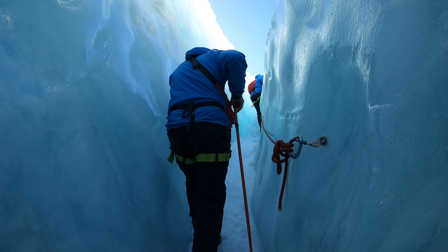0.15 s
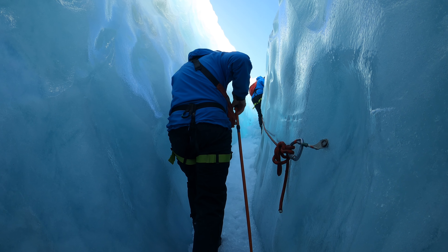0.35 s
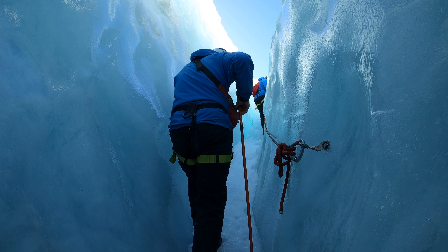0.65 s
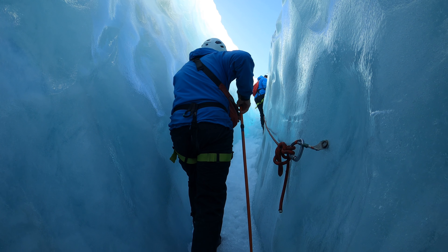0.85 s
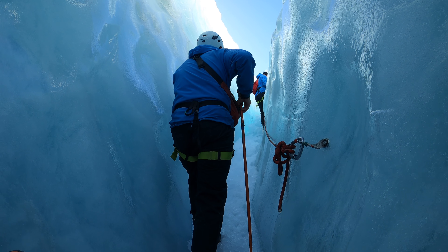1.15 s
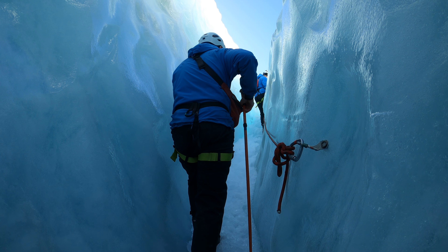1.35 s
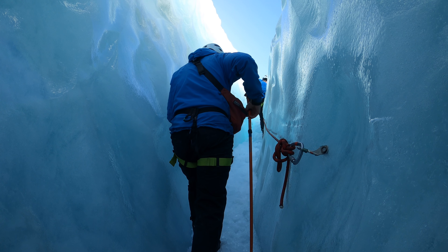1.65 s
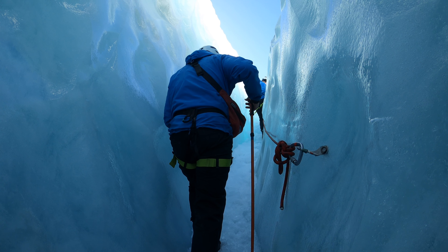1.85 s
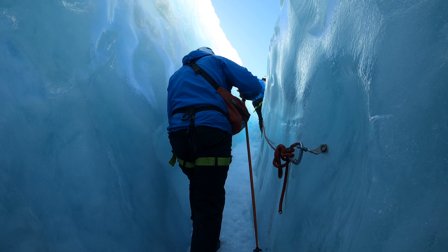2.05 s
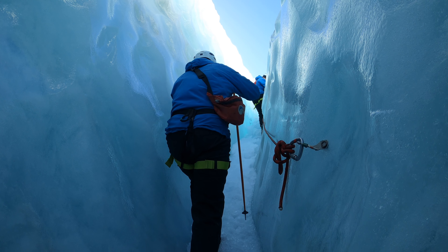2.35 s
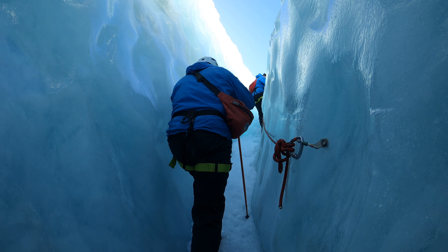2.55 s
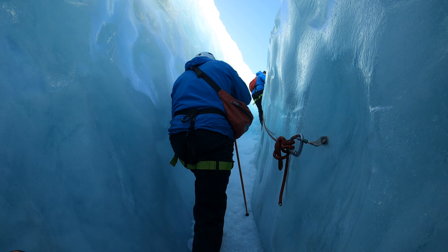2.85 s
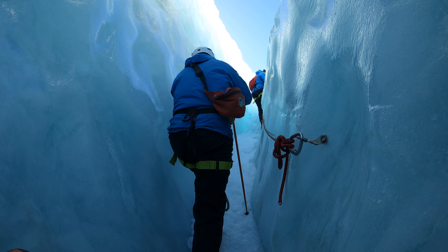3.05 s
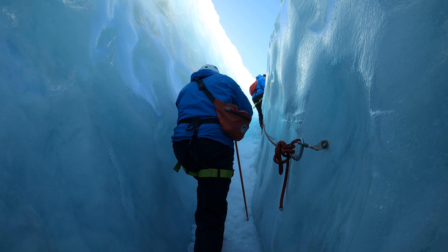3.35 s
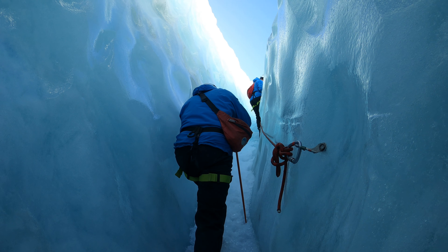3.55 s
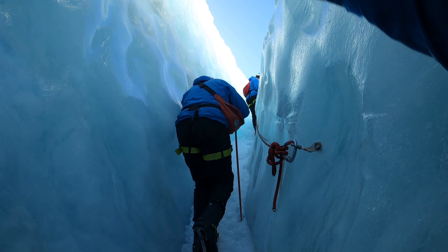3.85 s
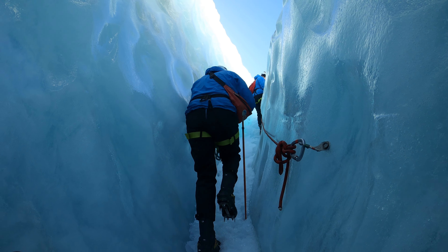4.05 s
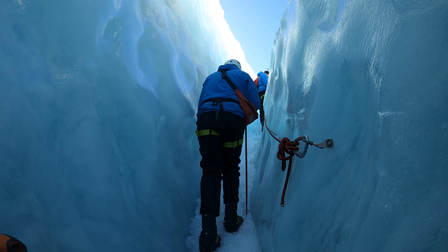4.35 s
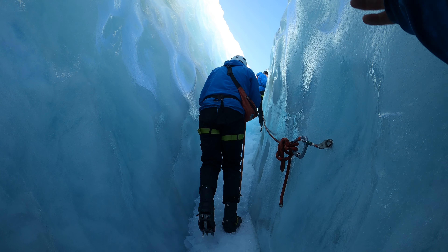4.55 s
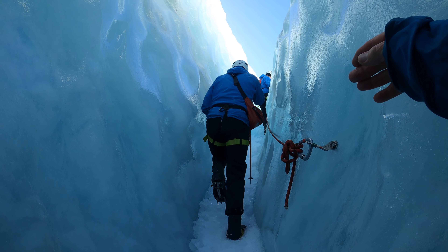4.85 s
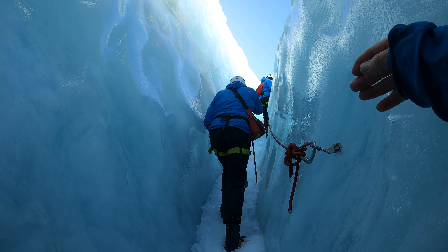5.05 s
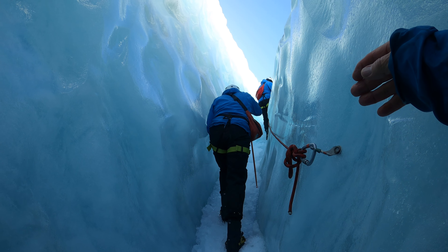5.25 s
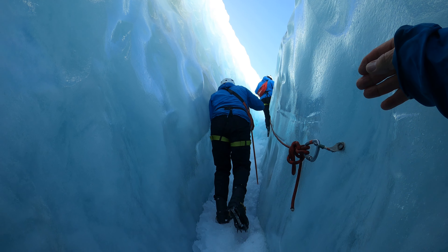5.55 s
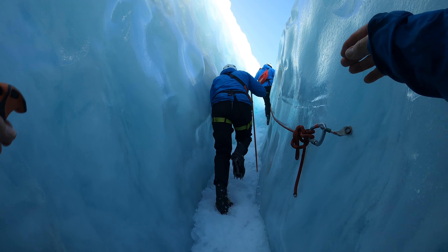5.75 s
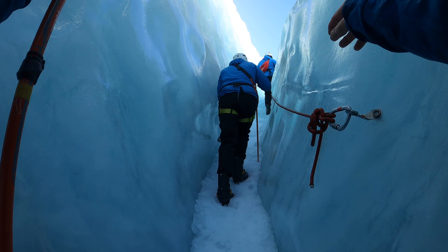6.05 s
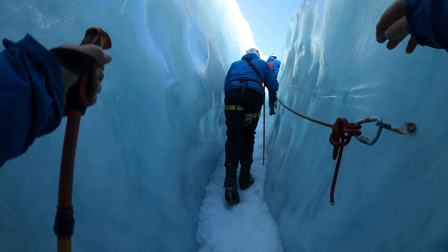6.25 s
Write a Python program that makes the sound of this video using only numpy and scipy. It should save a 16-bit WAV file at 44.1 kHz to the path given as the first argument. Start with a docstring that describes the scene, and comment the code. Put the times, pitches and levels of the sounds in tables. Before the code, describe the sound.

Spiked boots crunch unevenly on snow in a narrow ice passage, with gear ticks, strap rubbing and a dull heartbeat close to the microphone.

```python
"""Spiked boots crunch on snow and ice in a narrow slot of a glacier, heard from a camera on the walker's chest.
The crunch is brittle fracture: a dense train of impulses from snapping grains, with single cracks and ticks.
It echoes briefly between the ice walls and is coloured by the housing's two ports; metal links clink.
Heartbeat, strap rub, thuds, jolts and sway reach both capsules through the mount as structure-borne bass,
over the faint low noise of the slot."""
import sys
import numpy as np
from scipy import signal
from scipy.fft import rfft, irfft, next_fast_len
from scipy.io import wavfile
from scipy.ndimage import uniform_filter1d

SR = 44100
rng = np.random.default_rng(int(sys.argv[2]) if len(sys.argv) > 2 else 0)


def int16_out(signal):
    """Quantize to a 16-bit WAV file."""
    q = np.round(np.clip(np.atleast_2d(signal).T, -1, 1) * 32767)
    wavfile.write(sys.argv[1], SR, q.astype(np.int16))


N = 282328
T = np.arange(N) / SR

# boots and poles crushing or dragging through ice grains:
# t/s at full pressure, rise/s, hold/s, fall/s, body level/dB, crisp/dB re body, sizzle/dB re body
CRUNCHES = [(.66, .2, 0, 0.077, -56.5, -8.5, -45), (1.429, 0.16, 0.22, 0.15, -50, -12, -50),
            (1.566, 0.11, 0.13, 0.039, -50, -7, -29), (2.189, 0.016, 0, .05, -58, 5.5, -14),
            (2.292, 0.092, 0, .1, -54, -3, -26), (2.353, 0.02, 0.046, 0.38, -42, 1.5, -22),
            (2.468, 0.13, 0.072, 0.099, -31, -4.5, -29), (2.729, .12, 0.0011, 0.024, -36, -6, -31),
            (3.362, 0.033, 0.041, 0.092, -49, -10, -55), (3.439, .02, 0.012, 0.037, -32, -4, -30),
            (3.55, 0.067, 0, 0.053, -46, -2.5, -48), (3.661, 0.037, 0.011, 0.068, -35.5, -8, -35),
            (3.801, 0.19, 0.051, 0.1, -34.5, -6.5, -32.5), (4.017, 0.075, 0.056, 0.19, -40, -2, -29),
            (4.371, .08, 0.071, .13, -38.5, -5, -28), (4.56, 0.018, 0.015, 0.084, -36.5, -9, -33),
            (4.76, 0.067, 0.057, 0.81, -52.5, 2, -26), (4.96, 0.35, 0.15, 0.12, -34, -6.5, -41),
            (5.122, 0.046, 0.029, 0.13, -29, -6, -30), (5.26, .1, 0.025, 0.14, -46.5, 4.5, -13),
            (5.571, 0.068, 0.086, 0.11, -32, -5.5, -42), (5.76, 0.072, 0, 0.45, -36.5, -7, -45),
            (6.061, 0.041, 0.017, 0.063, -29.5, -7, -32), (6.137, .05, 0.027, 0.11, -42.5, -3.5, -32),
            (6.31, 0.15, 0.0049, 0.068, -42, -3, -40), (6.35, 0.016, 0.012, 0.042, -34.5, -6, -24),
            (6.395, .05, 0, .05, -40, 0, -20)]
# faint rustle of grains between the steps: t/s, body level/dB, crisp level/dB, sizzle level/dB
GRAIN_RUSTLE = [(0, -57, -65, -105), (.48, -66.5, -71.5, -104), (.84, -66, -72.5, -105),
                (1.09, -62, -71.5, -107), (1.26, -66, -71, -105), (1.75, -65.5, -66.5, -100),
                (2.01, -58, -62.5, -86), (2.14, -65, -76, -106), (2.65, -57, -53.5, -68),
                (2.78, -53.5, -54, -72), (2.9, -59.5, -57.5, -77), (3.06, -54, -64.5, -100),
                (3.33, -60, -65, -101), (3.6, -72, -69, -87), (3.93, -48.5, -48.5, -67),
                (4.25, -55.5, -53.5, -70.5), (4.6, -74, -58.5, -78.5), (5.4, -48.5, -47, -60.5),
                (6, -65, -49.5, -71), (6.4, -57, -59, -75)]
# spikes biting and crust breaking: t/s, level/dB, treble/dB re level, body t60/s
CRUST_CRACKS = [(.2246, -46, -30, 0.014), (.8972, -43, -13, 0.032), (2.2422, -40, -10, 0.024),
                (2.2842, -41, -11, .022), (2.358, -27.5, -5, 0.048), (2.4348, -19.5, -16, .035),
                (2.7076, -34, 7.5, 0.017), (2.781, -38, -16, 0.038), (2.8825, -37.5, -5, 0.059),
                (3.3694, -36.5, -19, .033), (3.427, -38, -7, .027), (3.441, -15, -7, 0.025),
                (3.5366, -29.5, -23, 0.018), (3.5588, -32.5, -16, 0.012), (3.5779, -30, -39, 0.031),
                (3.6597, -24.5, -1, 0.021), (3.669, -23, -5.5, 0.025), (3.7659, -28, 6.5, 0.013),
                (3.7881, -22.5, -26, 0.014), (3.8381, -18.5, -12, 0.058), (3.9812, -31.5, -31, 0.033),
                (4.0585, -34, -17, 0.02), (4.3309, -30.5, -1, 0.019), (4.3613, -22, -8, 0.029),
                (4.3808, -24.5, -15, 0.017), (4.4308, -37, -10, 0.035), (4.562, -18, -33, 0.034),
                (4.581, -31, -7, 0.027), (4.6269, -25, -26, .027), (4.736, -34, -5, .03),
                (5.025, -19.5, -30, 0.02), (5.1222, -29, -6, 0.028), (5.2648, -29.5, -16, 0.023),
                (5.5486, -22.5, -19, 0.022), (5.9816, -47, 9, .028), (6.0526, -24, -5, .024),
                (6.308, -30, -24, 0.025), (6.344, -15.5, -13, .024), (6.3677, -22, -4, 0.041),
                (6.3865, -19, -9, 0.019), (6.3954, -20.5, -14, 0.043)]
# small hard ticks of gear and ice chips: t/s, level/dB
CHIP_TICKS = [(0.0213, -45.5), (0.124, -44), (.2254, -49), (.258, -52), (0.659, -52), (0.865, -46),
              (0.9252, -49.5), (1.0096, -56), (1.233, -53), (1.3637, -48), (1.7942, -46), (1.912, -50),
              (1.983, -54), (2.182, -39.5), (2.2852, -38), (2.3455, -32), (3.0217, -45), (4.4061, -21.5),
              (4.557, -34), (6.343, -14), (6.3954, -23)]
# sound from straight ahead rings a port cavity near 3 kHz: t/s, level/dB re crisp
CAVITY_RING = [(0, 2), (1.2, -26), (1.6, -16), (2, -27), (2.5, -0.5), (3, -49), (3.6, -34), (4.2, -13),
               (5, -39), (6.4, -41)]
# bands of body, crisp, sizzle and cavity ring: lower f/Hz, upper f/Hz
CRUNCH_BANDS = [(40, 2000), (2000, 8200), (8200, 20000), (2650, 3450)]
# frequency responses of the housing's ports: f/Hz, gain/dB
LEFT_PORT_GAIN = [(700, -13), (1000, -2), (1220, 11), (1450, 4), (1900, -9), (2050, -16), (2400, -9),
                  (3000, -2), (3800, -6), (4900, -11.5), (5600, -16.5), (7600, -22.5), (8500, -36),
                  (12000, -35), (15000, -48)]
RIGHT_PORT_GAIN = [(700, -22.5), (1000, 2), (1280, 10.5), (1500, 0.5), (1900, -11), (2100, -10),
                   (2500, -15.5), (3100, -9.5), (3500, -6), (4000, -8.5), (4700, -5.5), (6200, -24.5),
                   (8100, -45.5), (10000, -44), (12500, -48), (15000, -68.5)]
# metal links ringing: t/s, level/dB, f/Hz, t60/s
LINK_MODES = [(.124, -46, 4760, 0.02), (.259, -51, 4900, 0.016), (0.865, -44, 3100, 0.025),
              (1.785, -73, 7700, 0.23), (1.822, -67, 4730, 0.092), (2.184, -47.5, 7270, 0.047),
              (2.286, -49, 7600, 0.065), (4.405, -61, 12000, 0.13)]
# heartbeats: t/s, level/dB, thump f/Hz, after-swing/dB re thump
HEARTBEATS = [(0.121, -24, 72.5, 0.5), (0.583, -23, 69, -9.5), (1.067, -31.5, 54.6, 0.5),
              (1.506, -25, 70, -10), (1.977, -23.5, 69.6, -7), (2.431, -25, 48.7, -6), (2.9, -32, 60, 1.5),
              (3.359, -28.5, 65.5, -2.5), (3.828, -37, 64, -9), (4.297, -34.5, 50, 5),
              (4.775, -26.5, 52.4, -13), (5.25, -27.5, 62, -3), (5.676, -25, 70, -32),
              (6.172, -25.5, 62.7, -1.5)]
# jolts of the mount: t/s, level/dB, f/Hz, t60/s
MOUNT_JOLTS = [(4.133, -25.5, 70, 0.26), (4.585, -30, 112, 0.18), (5.797, -20, 105, 0.12)]
# strap and jacket rubbing on the mount: t/s at full pressure, rise/s, hold/s, fall/s, level/dB
STRAP_RUBS = [(.02, .05, 0.089, .08, -51), (.36, 0.12, 0.054, 0.16, -60.5), (.53, .03, 0.15, .05, -56.5),
              (.78, 0.053, 0, 0.28, -55.5), (1.41, 0.1, 0.2, 0.24, -44.5), (1.69, .1, .02, .05, -57),
              (2.35, 0.0084, 0.013, .3, -44), (2.45, 0.09, .1, .09, -38), (2.73, 0.049, 0, 0.057, -53),
              (3.38, .04, 0, .06, -51), (3.79, 0.042, 0.049, .1, -35.5), (4.01, 0.065, 0.0084, 0.064, -37),
              (4.06, 0.039, .07, 0.12, -30), (4.39, 0.23, 0, 0.11, -39.5), (4.6, 0.27, 0.038, 0.047, -37.5),
              (4.76, 0.093, 0.13, .15, -44), (5.03, 0.25, 0.091, 0.23, -38), (5.28, 0.092, 0, 0.094, -59),
              (5.55, 0.013, 0.13, 0.057, -39), (5.79, 0.064, 0.032, 0.017, -32.5),
              (5.87, .05, .1, .1, -42.5), (5.99, 0.023, .2, 0.047, -34.5), (6.35, 0.15, 0, .1, -30)]
# dull thuds of the harness: t/s, hold/s, level/dB
HARNESS_THUDS = [(.1, 0.087, -48.5), (0.552, 0.095, -41.5), (0.666, 0.081, -47), (1.032, 0.36, -52),
                 (1.406, 0.18, -51), (1.75, 0.011, -60), (2.42, .1, -66), (2.775, 0.18, -51),
                 (3.393, 0, -36.5), (3.553, 0.14, -51.5), (3.92, 0.034, -40.5), (4.003, 0.035, -35),
                 (4.13, 0, -24.5), (4.28, 0.38, -50.5), (4.577, 0.07, -41), (4.75, 0.054, -42.5),
                 (5.04, 0, -46), (5.22, 0.048, -43.5), (5.72, 0.03, -51), (5.804, 0.16, -40.5),
                 (5.99, 0.12, -37), (6.24, 0.025, -44), (6.39, 0, -45)]
# deep rumble as the chest sways: t/s, level/dB
CHEST_SWAY = [(0, -37.5), (.5, -43.5), (1.3, -43), (1.7, -38.5), (1.8, -55.5), (2.05, -29), (2.3, -57.5),
              (2.6, -46.5), (3.2, -53.5), (3.75, -38.5), (3.96, -31), (4.06, -41), (4.13, -30), (4.28, -48),
              (4.65, -53), (4.76, -34), (5.1, -44.5), (5.3, -33.5), (5.55, -50), (5.8, -48), (5.97, -32.5),
              (6.05, -52.5), (6.4, -25)]
# noise spectra of rub, sway, thuds and the quiet slot: f/Hz, relative spectral density/dB
RUB_SPECTRUM = [(150, 3.5), (250, -3), (400, -9.5), (600, -14), (850, -17.5), (1100, -12.5), (2000, -74),
                (6000, -100)]
SWAY_SPECTRUM = [(12, -9), (22, 3), (45, -14.5), (75, -23), (130, -36), (300, -98), (1000, -120)]
THUD_SPECTRUM = [(40, -45), (75, 3.5), (110, -5), (170, -10), (260, -31.5), (600, -103), (2000, -110)]
SLOT_SPECTRUM = [(60, -22), (130, -10), (180, -8), (210, 0), (240, -12), (360, -20), (700, -29),
                 (1200, -50), (4000, -110)]

CRACK_SNAP_S, TICK_SNAP, TICK_T60_S = 0.13, 2.6, 0.019  # snaps weight the impulse against its burst
BODY_FLOOR_DB, CRISP_FLOOR_DB, CRISP_FLOOR_HZ = -80.5, -73, 5000
PLACES = 6  # spots on the floor, each with its own echo pattern
WALL_T60_S, WALL_DB, WALL_SHARED_HZ = 0.039, 1, 1560
PORT_TURN_HZ, PORT_TURN_WIDTH_HZ = 1990, 313  # around here the left port swings against the right
RECOIL_DELAY_S, RECOIL_RISE_S, RECOIL_FALL_S, RECOIL_DB = 0.099, 0.09, 0.11, -13
THUD_RISE_S, THUD_FALL_S, THUD_REST_DB, RUB_REST_DB = 0.071, 0.081, -68.5, -88
SLOT_DB, CUTOFF_HZ = -61, 15700


def footsteps():
    """Brittle fracture excites four parts, not yet band-limited: body, crisp, sizzle and cavity ring."""
    body_db, crisp_db, sizzle_db = crunch_levels()
    coarse = grains(per_s=6000, spread_db=2, flicker_hz=70, flicker_db=-1)
    fine = unit(grains(per_s=8000, spread_db=2, flicker_hz=60, flicker_db=1.5) + 0.34 * coarse)
    body = coarse * amp(body_db) + amp(BODY_FLOOR_DB) * rng.standard_normal(N)
    crisp = fine * amp(crisp_db)
    crisp += amp(CRISP_FLOOR_DB) * butterworth(rng.standard_normal(N), CRISP_FLOOR_HZ, "low")
    sizzle = fine * amp(sizzle_db)
    burst = rng.standard_normal(N) / 2  # peaks stand about twice above the rms
    for t, db, treble_db, t60 in CRUST_CRACKS:
        # the crust gives with a dull snap; the splinters build up just after it
        body += amp(db) * burst * decay(t, t60)
        body[int(t * SR)] += amp(db) * CRACK_SNAP_S / t60  # the shorter the crack, the harder its snap
        crisp += amp(db + treble_db) * burst * (decay(t, 2.2 * t60) - decay(t, 0.005))
    for t, db in CHIP_TICKS:
        crisp += amp(db) * burst * decay(t, TICK_T60_S)
        crisp[int(t * SR)] += amp(db) * TICK_SNAP
    cavity = crisp * amp(np.interp(T, *np.transpose(CAVITY_RING)))
    return body, crisp, sizzle, cavity


def grains(per_s, spread_db, flicker_hz, flicker_db):
    """Shot noise: crystals snap one by one in uneven flurries, a few far louder than the rest."""
    snaps = rng.random(N) < per_s / SR
    size_db = spread_db * rng.exponential(size=N)
    impulses = snaps * rng.standard_normal(N)
    return unit(impulses * amp(size_db + flicker_db * flicker(flicker_hz)))


def crunch_levels():
    """Steps and rustle add in power, giving the body, crisp and sizzle levels in dB."""
    times, *rustle_db = np.transpose(GRAIN_RUSTLE)
    *timing, body_db, crisp_re_body, sizzle_re_body = np.transpose(CRUNCHES)
    return [swells(zip(*timing, body_db + offset_db), np.interp(T, times, rest_db))
            for offset_db, rest_db in zip((0, crisp_re_body, sizzle_re_body), rustle_db)]


def airborne_crunch():
    """Convolution: each part of the footsteps passes through its band of the paths, at unit power gain."""
    parts = footsteps()
    place_of_sample = rng.integers(PLACES, size=N)
    size = next_fast_len(N + SR // 4)
    spectrum = 0
    for place in range(PLACES):
        path = housing_ports(wall_echoes())
        for part, edges_hz in zip(parts, CRUNCH_BANDS):
            band = butterworth(path, edges_hz, "band")
            band /= np.sqrt(np.sum(band ** 2) / 2)
            spectrum += rfft(part * (place_of_sample == place), size) * rfft(band, size)
    return irfft(spectrum, size)[:, :N]


def wall_echoes():
    """Stereo impulse response: direct sound, then diffuse reflections, coherent at low frequencies."""
    t = np.arange(SR // 8) / SR
    shared = butterworth(rng.standard_normal(len(t)), WALL_SHARED_HZ, "low")
    separate = butterworth(rng.standard_normal((2, len(t))), WALL_SHARED_HZ, "high")
    response = (shared + separate) * np.exp(-np.log(1000) * t / WALL_T60_S) * (t > .002)
    response *= amp(WALL_DB) / np.sqrt(np.sum(response ** 2) / 2)
    response[:, 0] += 1  # direct sound
    return response


def housing_ports(pair):
    """Each port filters with its own resonances; an all-pass turns the phase of the left one."""
    pole = np.exp((2j * PORT_TURN_HZ - PORT_TURN_WIDTH_HZ) * np.pi / SR)
    denominator = np.array([1, -2 * pole.real, abs(pole) ** 2])
    left = signal.lfilter(denominator[::-1], denominator, pair[0])
    right = np.roll(pair[1], 4)  # a four-sample delay sets the stereo phase of the crunch near 1 kHz
    ports = np.array([minimum_phase(LEFT_PORT_GAIN), minimum_phase(RIGHT_PORT_GAIN)])
    return signal.fftconvolve(np.array([left, right]), ports, axes=1)


def clinks():
    """Each metal link rings in one damped mode, mostly caught by the brighter left port."""
    ring = sum(amp(db) * (decay(t, t60) - decay(t, 0.0053)) * np.sin(2 * np.pi * hz * (T - t))
               for t, db, hz, t60 in LINK_MODES)
    roughness = 1 + .5 * flicker(350)
    return ring * roughness * amp([[4], [-8]])


def heartbeat():
    """Each beat is a Gaussian tone pulse, followed by a damped free swing of the chest wall."""
    beats = 0
    for t, db, hz, swing_db in HEARTBEATS:
        age = T - t
        thump = np.exp(-((age - .008) / 0.012) ** 2) * np.cos(2 * np.pi * hz * age)
        thump += 0.18 * np.exp(-((age - .004) / 0.0049) ** 2) * np.cos(2 * np.pi * 1.83 * hz * age)
        swing = decay(t + .015, t60=.32) * np.sin(2 * np.pi * 27 * (age - .015))
        beats += amp(db) * (thump + amp(swing_db) * swing)
    return beats


def jolts():
    """A knock on the mount cracks first, then its pitch drops to the mount's natural frequency."""
    knocks = 0
    for t, db, hz, t60 in MOUNT_JOLTS:
        age = np.clip(T - t, 0, 1)
        cycles = hz * age + 0.53 * (1 - np.exp(-age / 0.00079))
        knocks += amp(db) * decay(t, t60) * np.sin(2 * np.pi * cycles)
    return knocks


def strap_rub():
    """Sliding friction of strap and jacket makes noise that swells with the pressure."""
    return mount_noise(RUB_SPECTRUM, swells(STRAP_RUBS, RUB_REST_DB), width=.16, flicker_hz=30)


def chest_sway():
    """Slow motion of the chest makes a rumble, which swells again shortly after each heartbeat."""
    recoils = [(t + RECOIL_DELAY_S, RECOIL_RISE_S, 0, RECOIL_FALL_S, db + RECOIL_DB)
               for t, db, *_ in HEARTBEATS]
    level_db = swells(recoils, np.interp(T, *np.transpose(CHEST_SWAY)))
    return mount_noise(SWAY_SPECTRUM, level_db, width=.12, flicker_hz=10)


def harness_thuds():
    """Soft impacts of the harness give bursts of low-frequency noise."""
    thuds = [(t, THUD_RISE_S, hold, THUD_FALL_S, db) for t, hold, db in HARNESS_THUDS]
    return mount_noise(THUD_SPECTRUM, swells(thuds, THUD_REST_DB), width=.06, flicker_hz=20)


def mount_noise(spectrum, level_db, width, flicker_hz):
    """Structure-borne noise is nearly coherent at the two capsules; its level flickers."""
    return stereo_noise(spectrum, width) * amp(level_db + 2.5 * flicker(flicker_hz))


def quiet_slot():
    """The background is stationary noise with a spectral peak near 210 Hz."""
    return amp(SLOT_DB) * stereo_noise(SLOT_SPECTRUM, width=.15)


def swells(rows, rest_db):
    """Power sum in dB of a resting level and swells (t, rise, hold, fall, dB); each slope spans 20 dB."""
    grid = T[::SR // 1000]
    power = amp(2 * np.interp(grid, T, np.broadcast_to(rest_db, N)))
    for t, rise, hold, fall, db in rows:
        before = np.clip(t - grid, 0, None) / max(rise, .01)
        after = np.clip(grid - t - hold, 0, None) / max(fall, .01)
        power += amp(2 * (db - 20 * (before + after)))
    return np.interp(T, grid, 10 * np.log10(power))


def decay(start, t60):
    """Exponential damping: the envelope jumps to 1 at start and falls 60 dB in t60."""
    envelope, first = np.zeros(N), int(np.ceil(start * SR))
    span = slice(first, first + SR // 2)
    envelope[span] = np.exp(-np.log(1000) * (T[span] - start) / t60)
    return envelope


def flicker(rate_hz):
    """Random modulation: Gaussian values drawn at rate_hz and joined by ramps."""
    hold = int(SR / rate_hz)
    return uniform_filter1d(np.repeat(rng.standard_normal(N // hold + 1), hold), hold)[:N]


def stereo_noise(spectrum, width):
    """Two independent noises of one spectrum: mid in phase at rms 1, side in antiphase at rms width."""
    mid, side = (unit(irfft(rfft(rng.standard_normal(N)) * bin_gains(spectrum, N), N)) for _ in range(2))
    return mid + width * side * np.array([[1], [-1]])


def minimum_phase(spectrum, size=2048):
    """Folding the cepstrum onto positive time gives the minimum-phase impulse response."""
    cepstrum = irfft(np.log(bin_gains(spectrum, size)), size)
    cepstrum[1:size // 2] *= 2
    cepstrum[size // 2 + 1:] = 0
    return irfft(np.exp(rfft(cepstrum)), size)[:size // 2]


def bin_gains(spectrum, size):
    """Amplitude at each FFT bin, from (f/Hz, level/dB) points joined on a log-frequency axis."""
    hz, db = np.transpose(spectrum)
    return amp(np.interp(np.log(np.fft.rfftfreq(size, 1 / SR) + 1), np.log(hz), db))


def butterworth(x, hz, kind):
    return signal.sosfilt(signal.butter(4, hz, kind, fs=SR, output="sos"), x)


def amp(db):
    return 10 ** (np.asarray(db) / 20)


def unit(x):
    return x / np.sqrt(np.mean(x ** 2))


def scene():
    """Superposition of airborne sound, structure-borne sound and background; the bass leans just left."""
    background = quiet_slot()
    airborne = airborne_crunch() + clinks()
    structure_borne = jolts() + heartbeat() + strap_rub() + chest_sway() + harness_thuds()
    return airborne + (structure_borne + background) * amp([[.3], [-.3]])


def record(dry):
    """The camera limits the bandwidth with a steep elliptic low-pass."""
    return signal.sosfilt(signal.ellip(8, .2, 70, CUTOFF_HZ, fs=SR, output="sos"), dry)


dry = scene()
out = record(dry)
int16_out(out)
```